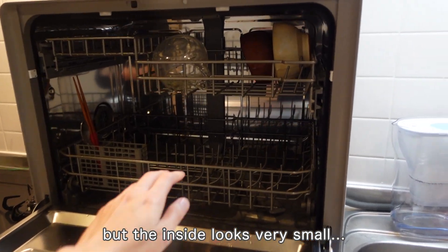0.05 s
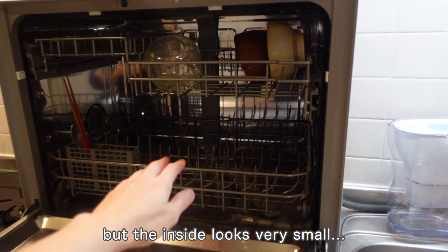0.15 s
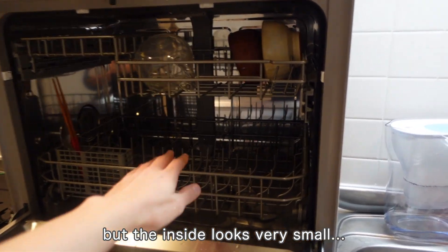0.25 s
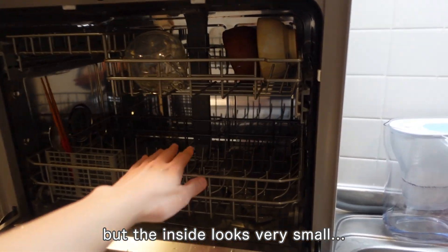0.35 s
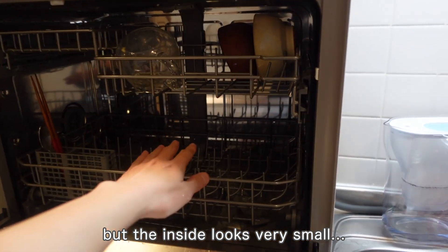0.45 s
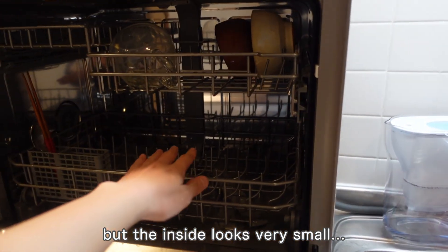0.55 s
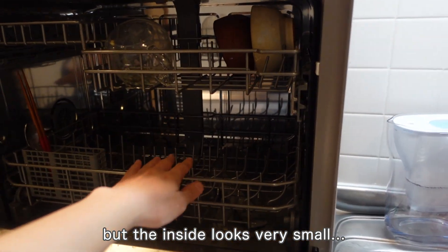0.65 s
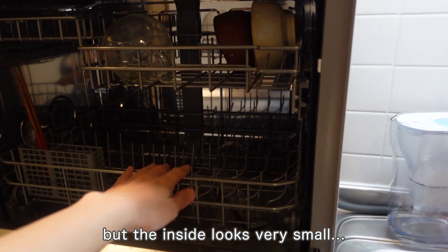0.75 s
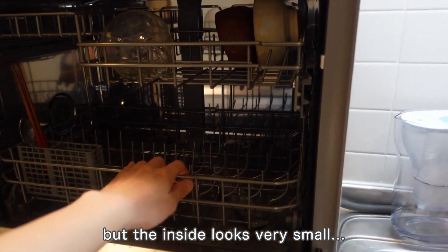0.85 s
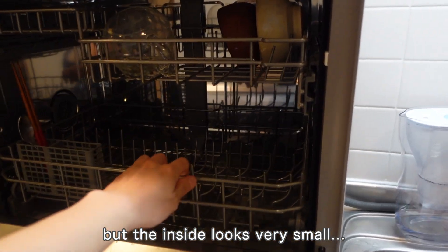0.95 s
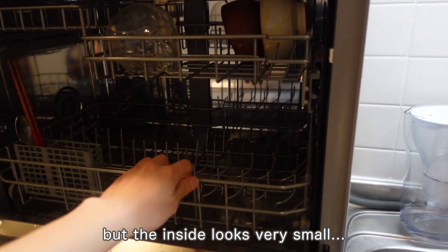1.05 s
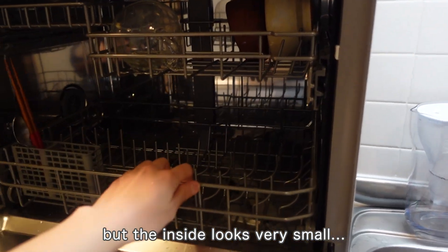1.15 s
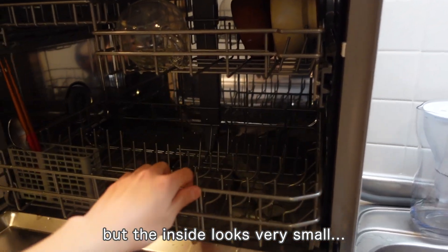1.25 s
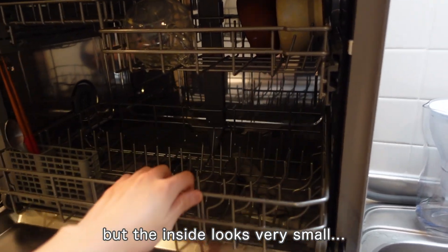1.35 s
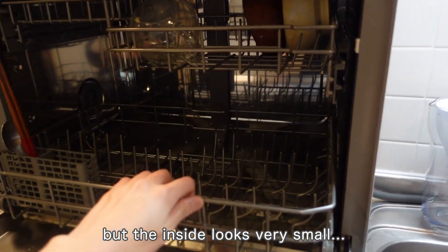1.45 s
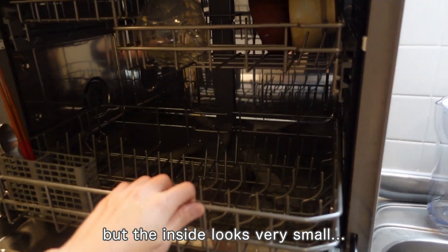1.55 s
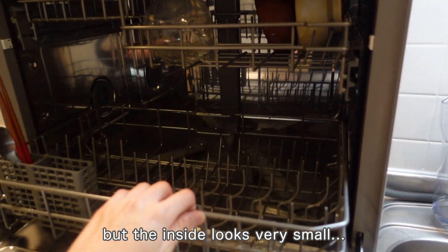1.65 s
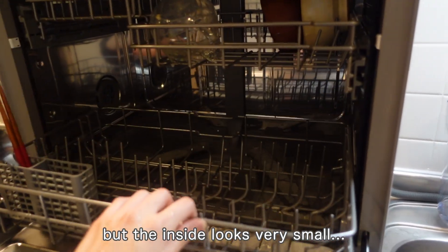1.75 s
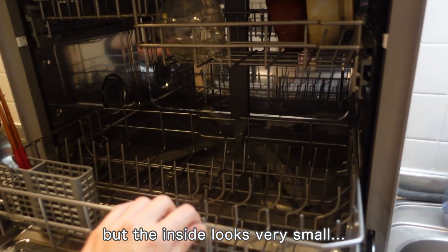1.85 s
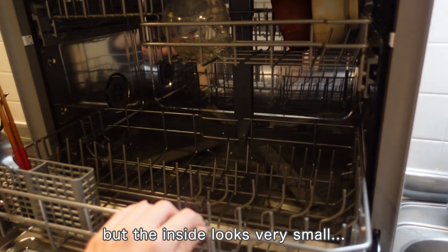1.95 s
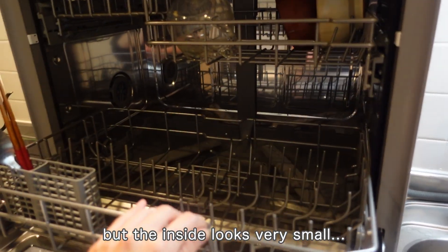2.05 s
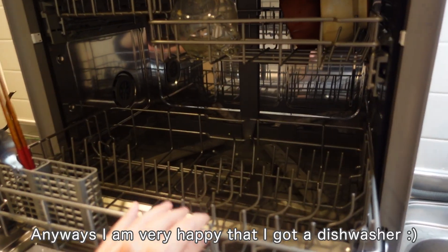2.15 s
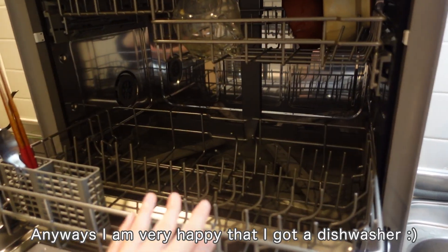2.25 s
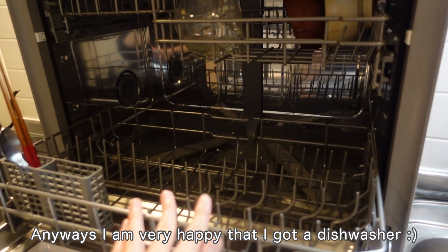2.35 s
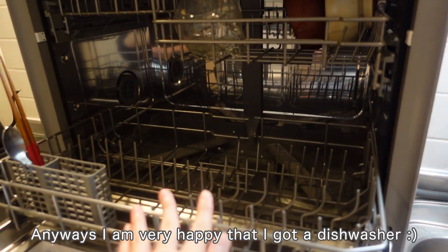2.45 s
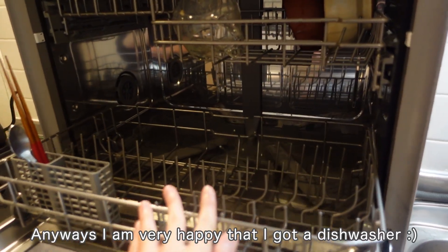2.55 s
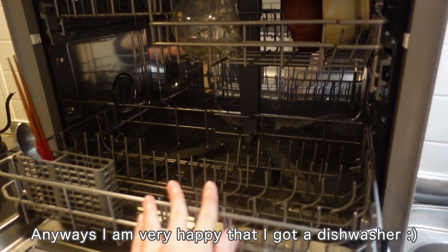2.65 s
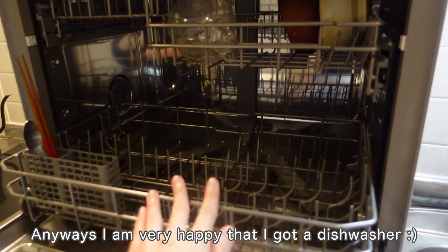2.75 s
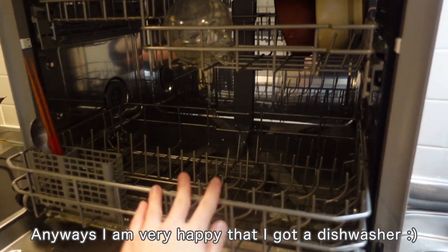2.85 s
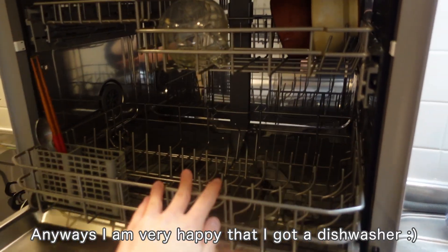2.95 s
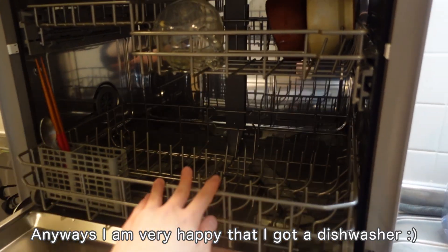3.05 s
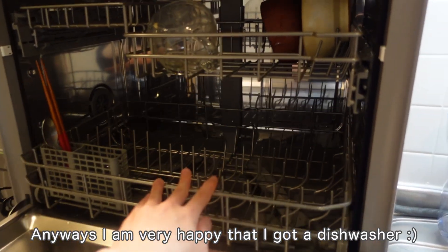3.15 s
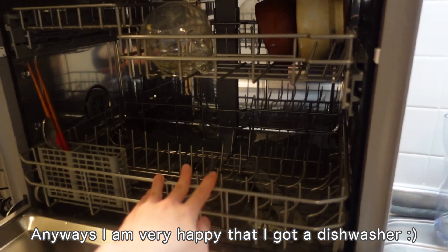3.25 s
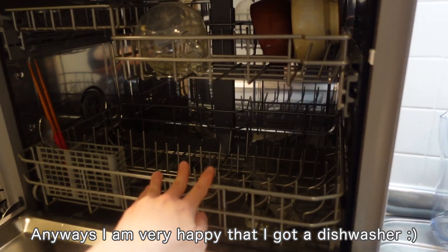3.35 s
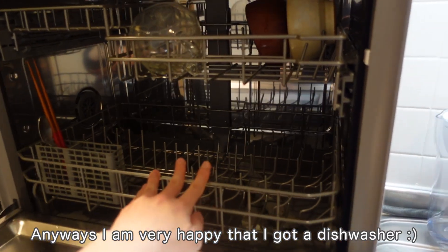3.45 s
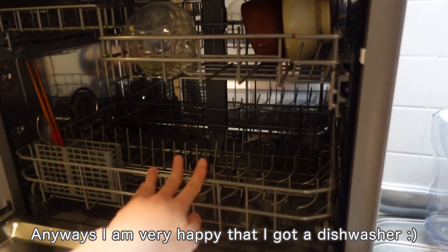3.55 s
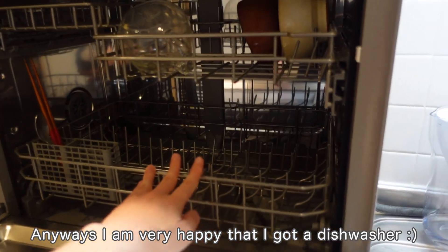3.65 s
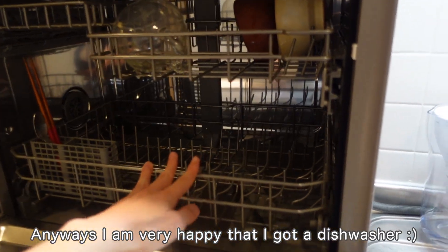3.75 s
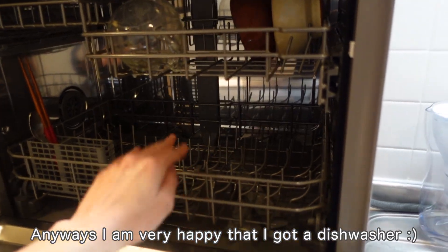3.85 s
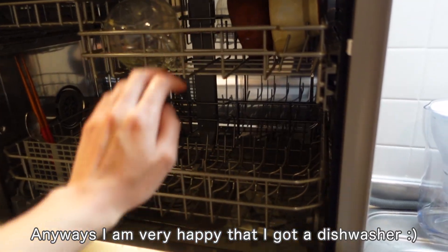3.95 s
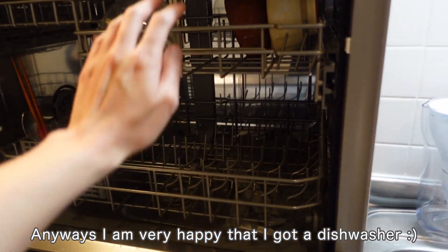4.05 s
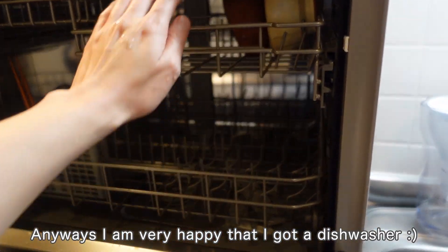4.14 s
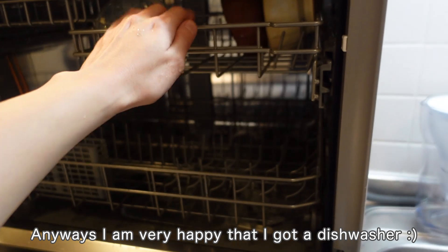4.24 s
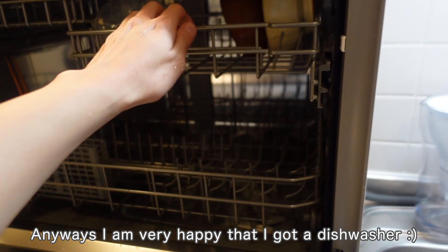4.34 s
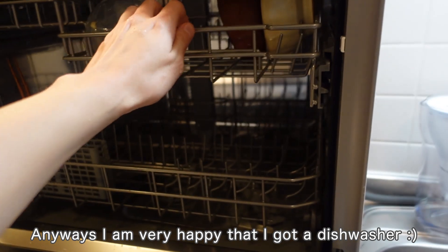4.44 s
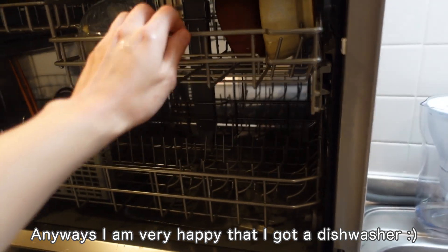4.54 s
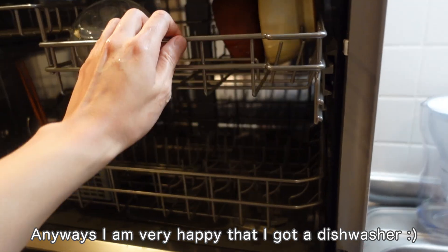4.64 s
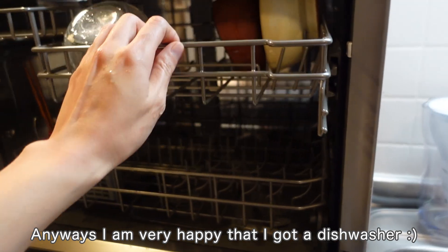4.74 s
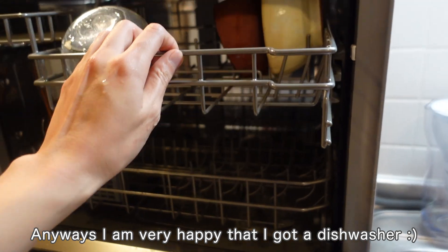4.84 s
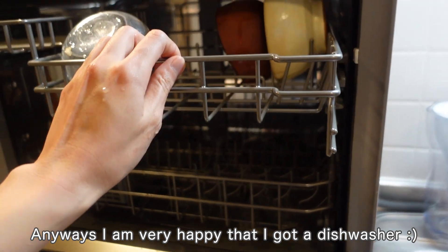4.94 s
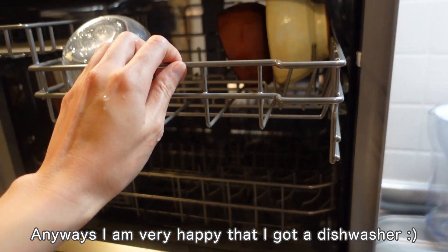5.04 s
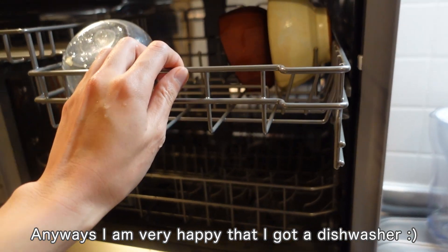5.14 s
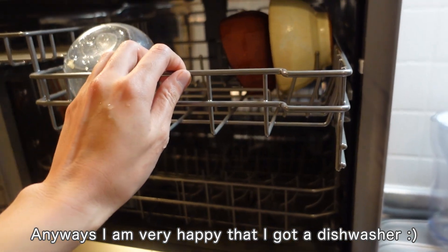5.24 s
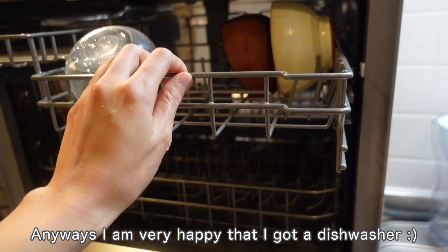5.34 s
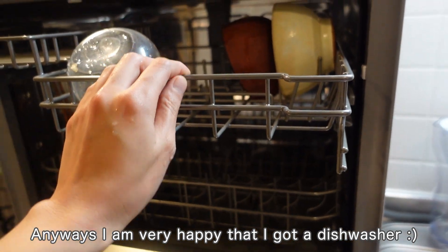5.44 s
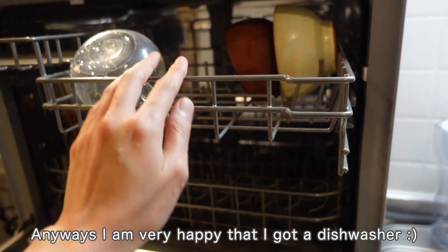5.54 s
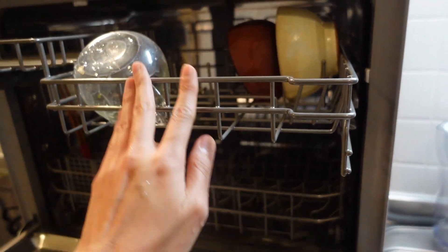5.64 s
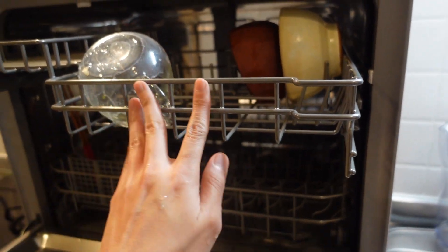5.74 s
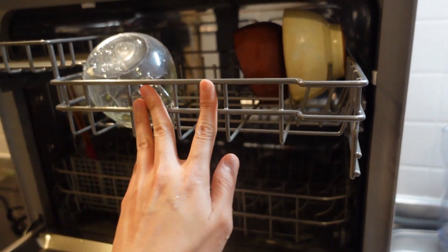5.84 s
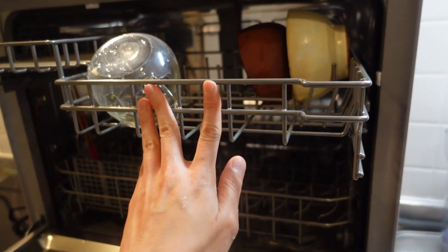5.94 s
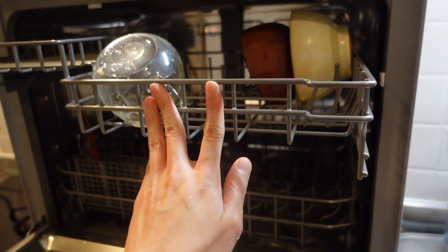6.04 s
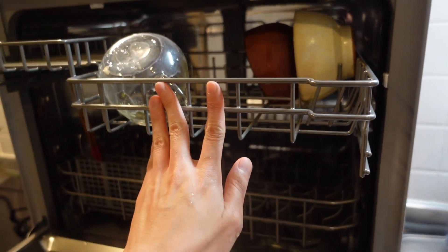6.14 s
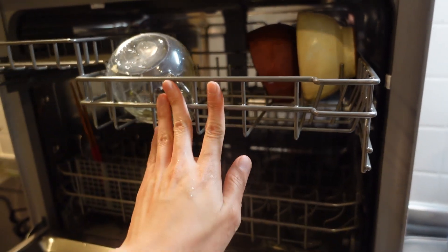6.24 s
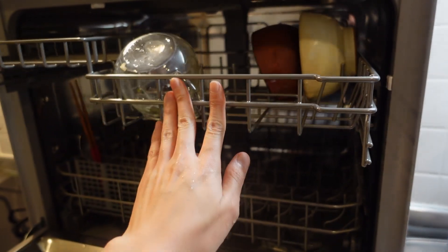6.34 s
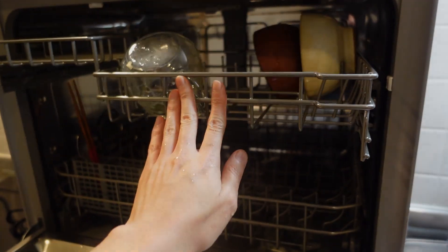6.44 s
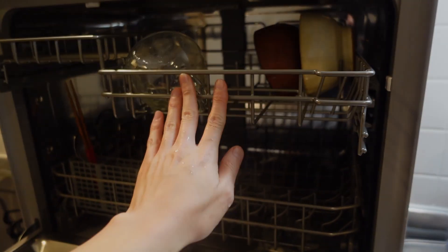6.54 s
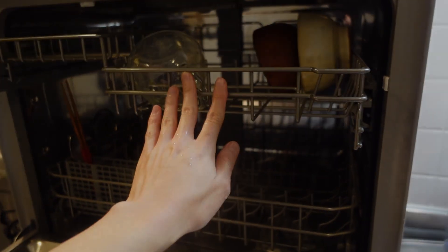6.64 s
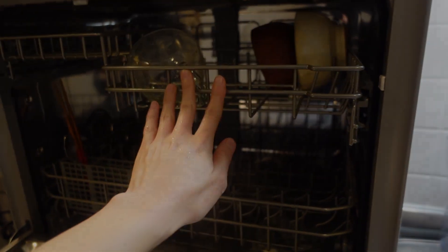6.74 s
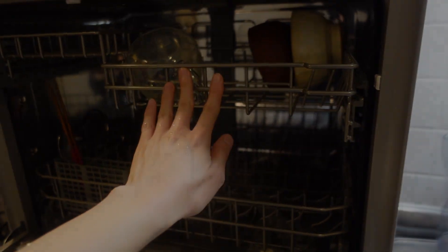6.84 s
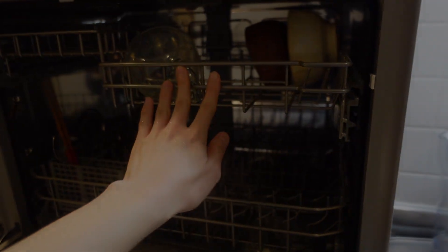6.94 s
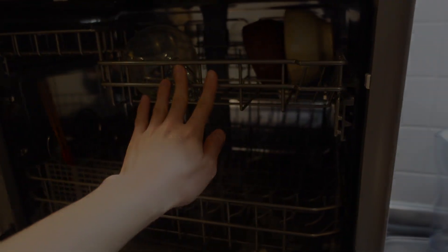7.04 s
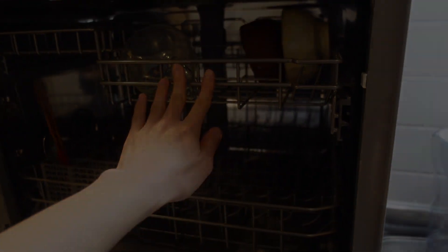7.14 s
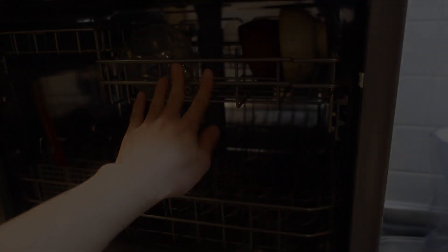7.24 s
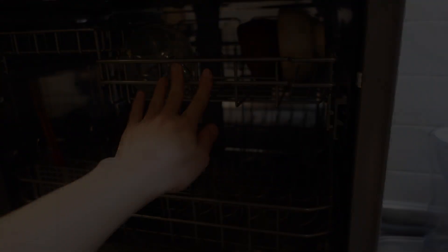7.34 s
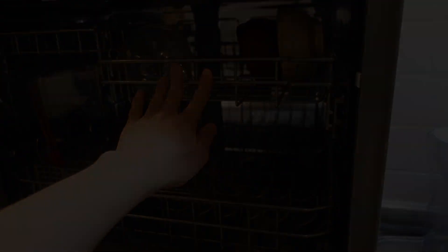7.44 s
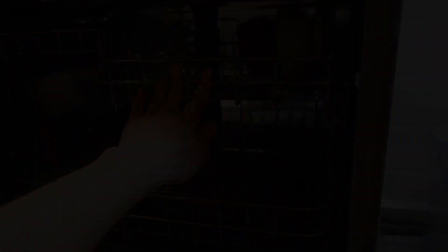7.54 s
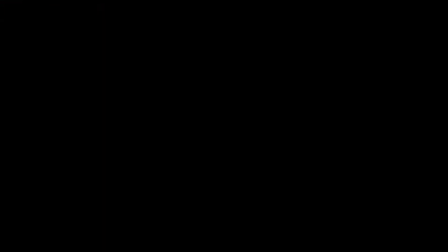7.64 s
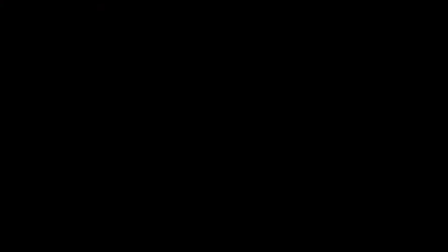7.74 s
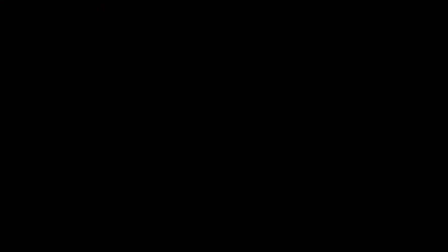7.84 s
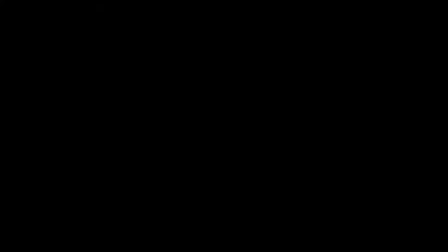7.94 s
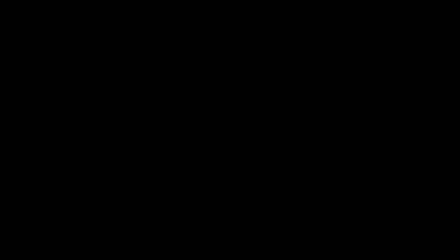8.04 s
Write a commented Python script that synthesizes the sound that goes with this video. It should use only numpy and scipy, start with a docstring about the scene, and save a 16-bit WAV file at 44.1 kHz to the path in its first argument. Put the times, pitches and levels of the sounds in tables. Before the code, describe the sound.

After a faint fading hiss and near silence, a lower wire rack knocks and rumbles on its wheels, out and back, climbing into the tub with bright cutlery jingle. The upper rack follows: hissing runners, a glass clink, one loud metallic slam, a quiet gap, then a slow push home with scattered clacks and ceramic rattling. Close stereo pickup, metal tub resonance, small tiled kitchen, no talking.

```python
"""A soft hiss fades as a hand reaches in; then the hand rolls the lower wire rack of a small dishwasher out and back.
Its plastic wheels rumble, its wires knock, and cutlery jingles as it climbs back into the tub.
The upper rack slides out on hissing runners, slams on its front stop and is pushed home; a glass bowl, then cups
chatter on its wires. Knocks are noisy cracks with damped partials, dishes ring in modes, sliding is filtered noise.
The steel tub and a tiled kitchen ring after every blow, over a quiet room tone."""
import sys
import numpy as np
from scipy import signal
from scipy.fft import rfft, irfft
from scipy.io import wavfile

SR = 44100
rng = np.random.default_rng(int(sys.argv[2]) if len(sys.argv) > 2 else 0)


def master_out(mix):
    """Clip the mix to full scale and print it as 16-bit PCM to the path in sys.argv[1]."""
    frames = np.transpose(np.atleast_2d(mix))
    ceiling = np.clip(frames, -1, 1)
    pcm = np.round(ceiling * 32767).astype(np.int16)
    wavfile.write(sys.argv[1], SR, pcm)


N = 356769
TIME = np.arange(N) / SR
RING = TIME[:SR]  # one second, for decays
TOP_HZ = 15900  # upper edge of the sound


def amp(db):
    """Decibels to gain."""
    return 10 ** (np.asarray(db) / 20)


def unit(x):
    """Scale to rms 1."""
    return x / np.sqrt(np.mean(x ** 2))


def fade(t60):
    """One second of exponential decay, falling 60 dB in t60 seconds."""
    return np.exp(-np.log(1000) * RING / max(t60, 1 / SR))


def add(track, s, sound):
    """Mix a sound into a track from time s on."""
    start = int(s * SR)
    track[start:start + len(sound)] += sound[:N - start]


def band(x, lo_hz, hi_hz):
    """Causal band-pass."""
    edges = [lo_hz, min(hi_hz, SR / 2 - 1)]
    return signal.sosfilt(signal.butter(3, edges, "band", fs=SR, output="sos"), x)


def colour(x, points):
    """Causal minimum-phase filter through (Hz, dB) points, from the folded cepstrum."""
    hz, db = np.transpose(points)
    size = 2 ** 11
    log_hz = np.log(np.fft.rfftfreq(size, 1 / SR) + 1)
    gain = amp(np.interp(log_hz, np.log(hz), db))
    cepstrum = irfft(np.log(gain))[:size // 2]
    cepstrum[1:] *= 2
    impulse = irfft(np.exp(rfft(cepstrum, size)))
    return signal.oaconvolve(x, impulse)[:len(x)]


# Colour of the opening hiss. Each row: frequency in Hz, gain in dB.
HISS_COLOUR = [(180, -64), (300, -30), (616, -23), (750, -11), (991, -17), (1290, -4), (2140, 5),
               (6300, -1.5), (15000, -26)]


def reaching_hiss():
    """Soft filtered noise that fades steadily as the hand reaches in."""
    start_db, fade_db_per_s = -43.5, 74.5
    noise = unit(colour(rng.standard_normal(N), HISS_COLOUR))
    return amp(start_db - fade_db_per_s * TIME) * noise


# Colour of the quiet room. Each row: frequency in Hz, gain in dB.
ROOM_COLOUR = [(18, -50.5), (30, -11.5), (92, -32), (120, -9), (202, -8.5), (277, -3), (492, -2.5),
               (639, -1), (874, -4), (1550, 0), (3980, -7.5), (7650, -12), (15500, -16)]


def room_tone(level_db):
    """Steady filtered noise of the quiet room."""
    return amp(level_db) * unit(colour(rng.standard_normal(N), ROOM_COLOUR))


# Reverberation of tub and kitchen. Each row: frequency in Hz, 60 dB decay time in seconds, level in dB.
TUB = [(60, 0.3, -3.5), (200, 0.65, -6.5), (458, 0.25, -6), (970, 0.89, -5), (2200, 0.54, -11.5),
       (4500, 0.83, -9.5), (9000, 0.17, -8.5), (16000, 0.63, -9)]


def tub_tail():
    """Diffuse reverberation: noise that swells and decays, octave by octave, each with its own decay time."""
    hz, t60, db = np.transpose(TUB)
    tail = 0
    for centre in 45 * 2. ** np.arange(9):
        octave_t60 = np.interp(np.log(centre), np.log(hz), t60)
        octave_db = np.interp(np.log(centre), np.log(hz), db)
        decay = fade(octave_t60) * (1 - fade(0.046))
        echoes = rng.standard_normal(SR) * decay / np.linalg.norm(decay)
        tail = tail + amp(octave_db) * band(echoes, centre / np.sqrt(2), centre * np.sqrt(2))
    return tail


def strike(hits, modes):
    """Each hit rings the object's modes; where it lands changes their mix, and the contact detunes them a little."""
    hz, db, t60 = np.transpose(modes)
    length = SR // 2
    swell = 1 - fade(0.0067)
    decays = np.array([fade(t) * swell for t in t60])[:, :length]
    out = np.zeros(N)
    for s, hit_db, *_ in hits:
        place, contact, sign = rng.standard_normal((3, len(hz)))
        mix = amp(db + 2 * place) * np.sign(sign)
        detuned_hz = hz * (1 + .003 * contact)
        waves = np.cos(2 * np.pi * np.outer(detuned_hz, RING[:length])) * decays
        add(out, s, amp(hit_db) * mix / np.linalg.norm(mix) @ waves)
    return band(out, 110, TOP_HZ)


# Faint, dull blips in the pauses. Each row: start in seconds, level in dB.
BLIPS = [(.43, -55.5), (4.112, -57.5), (4.16, -60)]
# Ringing of a blip. Each row: frequency in Hz, relative level in dB, 60 dB decay time in seconds.
BLIP_MODES = [(560, -11, .08), (610, -6, 0.134)]


def blips():
    """Faint, dull blips made of a few short modes."""
    return strike(BLIPS, BLIP_MODES)


def sliding(strokes, power):
    """Gain of a sliding noise: in each stroke the rack speeds up evenly, runs on and slows to rest."""
    gain = np.zeros(N)
    for start, rise, steady, fall, db in strokes:
        corners = start + np.cumsum([0, rise, steady, fall])
        speed = np.interp(TIME, corners, [0, 1, 1, 0])
        gain += amp(db) * speed ** power
    return gain


def friction(points, rate, waver_db, waver_rate):
    """Tiny slips of uneven size, rate per second on average; the hand's pressure wavers."""
    slips = (rng.random(N) < rate / SR) * rng.standard_normal(N)
    pressure = np.interp(TIME * waver_rate, np.arange(SR), rng.standard_normal(SR))
    return unit(colour(slips, points) * amp(waver_db * pressure))


# What each bounce loses. One row: clack loss in dB, thud loss in dB, tick loss in dB.
CHATTER_LOSS_DB = (3, -0.1, 6.0)


def contacts(knocks, skew_s, count=3):
    """One side lands, then the other, skew_s later; a heavy landing bounces on, losing clack and most of all tick."""
    chatter_above_db, gap_s = -27.5, .008  # clack that starts the bouncing, mean time between bounces
    hits = []
    for (s, *near_db, far_db), chance in zip(knocks, rng.uniform(-1, 1, (len(knocks), count))):
        landing_db = np.add(near_db, far_db)
        hits += [(s, *near_db), (s + skew_s, *landing_db)]
        if landing_db[0] > chatter_above_db:
            bounces = s + skew_s + np.cumsum(gap_s * (1 + .2 * chance))
            for k, at in enumerate(bounces):
                hits.append((at, *(landing_db - np.multiply(CHATTER_LOSS_DB, k + 1))))
    return hits


def wire_modes(length, spacing_hz):
    """Steady partials at random frequencies, spacing_hz apart on average."""
    present = rng.random(length // 2 + 1) < SR / length / spacing_hz
    phases = np.exp(2j * np.pi * rng.random(len(present)))
    return unit(irfft(present * phases, length))


def clatter(knocks, points, t60s, trims_db, crack_db, crack_t60, rise, spacing_hz, lowest_hz, low_hz, high_hz):
    """A knock is a short noisy crack, then the quickly damped partials of the welded wires it reaches."""
    out = np.zeros(N)
    bands = [(low_hz, high_hz), (lowest_hz, low_hz), (high_hz, TOP_HZ)]  # clack, thud, tick
    length, level_window = SR // 4, SR // 100  # a knock's energy is levelled as if it filled the window
    swell = 1 - fade(rise)[:length]  # the blow takes a moment to spread through the rack
    for s, *levels_db in knocks:
        partials = wire_modes(length, spacing_hz)
        crack = amp(crack_db) * rng.standard_normal(length) * fade(crack_t60)[:length]
        for edges, t60, db, trim_db in zip(bands, t60s, levels_db, trims_db):
            blow = swell * (crack + partials * fade(t60)[:length])
            wires = band(colour(blow, points), *edges)
            add(out, s, amp(db + trim_db) * wires / np.sqrt(np.sum(wires ** 2) / level_window))
    return out


def hard_blows(knocks, full_db, steepness):
    """Light knocks stay near the contact; only hard ones set the whole frame ringing."""
    return [(s, db + steepness * min(db - full_db, 0)) for s, db, *_ in knocks]


# The lower rack is gripped, drops onto the door, rolls out and back, climbs into the tub and meets the back stop.
# Each row: start in seconds, clack, thud and tick levels in dB before trims, far side's landing in dB
# relative to the first.
LOWER_KNOCKS = [ (1.012, -44.5, -69, -54, 3.5), (1.192, -40.5, -63, -53, 1),
                (1.2305, -32.5, -58, -34.5, -8), (1.322, -20.5, -36.5, -31, 6.5),
                (1.42, -26, -27, -46, -5.5), (1.52, -37, -37, -61, -5), (1.758, -40, -51, -65, -17),
                (1.841, -31.5, -61, -49.5, -5.5), (2.176, -42.5, -72, -59, -5.5),
                (2.418, -35, -61, -47.5, -9), (2.627, -36, -53, -50, -7), (2.778, -34.5, -50, -52.5, 5.5),
                (3.168, -42, -64, -51, -9), (3.2255, -29.5, -53.5, -35.5, 2), (3.256, -22.5, -42, -26, 0),
                (3.2885, -21, -44, -18.5, -14), (3.312, -24, -42, -19.5, -2), (3.348, -21.5, -40, -28, -8),
                (3.403, -31, -39, -33.5, 1.5), (3.764, -25, -31.5, -32.5, -5)]
# Ringing of the lower frame. Each row: frequency in Hz, relative level in dB, 60 dB decay time in seconds.
LOWER_MODES = [(230, -11, .2), (395, -5, .2), (500, -5, .2), (655, 0, .22), (740, -3, .2), (955, -5, .18),
               (1171, -3, .2), (1580, -3, .2), (1730, 0, .22), (2000, -4, .2), (2153, -5, .22),
               (2550, -3, .22), (2790, -3, .2)]
# Colour of the lower knocks. Each row: frequency in Hz, gain in dB.
LOWER_COLOUR = [(40, -37.5), (130, -24), (225, -15.5), (290, -16.5), (650, -7.5), (900, 4), (1700, 11.5),
                (2800, 4.5), (3600, -2), (6000, -7.5), (8400, -10.5), (11000, -21), (15500, -34)]
# Colour of the rolling wheels. Each row: frequency in Hz, gain in dB.
ROLL_COLOUR = [(50, -36), (145, -28), (225, 0.5), (300, -9), (410, -5), (520, -0.5), (660, 5), (860, -2),
               (1700, 1.5), (2300, 0.5), (3400, -14), (5500, -18), (8600, -16.5), (15500, -38)]
# Strokes of the hand on the lower rack. Each row: start in seconds, speeding up, steady and slowing times
# in seconds, rumble in dB at full speed before the wheels are mixed.
LOWER_STROKES = [(0.979, 0.05, .01, .12, -52), (.95, 0.44, .06, 0.96, -46.5), (2.31, .4, 0.68, 0.49, -50.5),
                 (3.76, .05, .03, 0.18, -55)]


def lower_rack():
    """Plastic wheels rumble over steel, louder with speed; the askew rack knocks and its frame rings."""
    hits = contacts(LOWER_KNOCKS, skew_s=.02)
    knocks = clatter(hits, LOWER_COLOUR, t60s=(.1, .13, .085), trims_db=(-6, -3, -3), crack_db=-2.5,
                     crack_t60=0.033, rise=0.0016, spacing_hz=50.47, lowest_hz=35, low_hz=587, high_hz=3540)
    ring = amp(-15.5) * strike(hard_blows(hits, full_db=-19.0, steepness=0.44), LOWER_MODES)
    # the wheels on either side each meet their own grit
    wheels = sum(friction(ROLL_COLOUR, rate=1200, waver_db=2.5, waver_rate=50) for _ in range(2))
    coarse_grains = amp(-8) * friction(ROLL_COLOUR, rate=64, waver_db=1.5, waver_rate=11)
    rumble = amp(-4.5) * sliding(LOWER_STROKES, power=1.76) * (wheels + coarse_grains)
    return knocks + ring + rumble


# Cutlery jumping in its basket. Each row: start in seconds, level in dB.
CUTLERY_HITS = [(3.283, -17), (3.290, -25.5), (3.312, -29), (3.333, -35), (3.403, -46)]
# Ringing of the cutlery. Each row: frequency in Hz, relative level in dB, 60 dB decay time in seconds.
CUTLERY_MODES = [(2078, -8, .2), (2771, 0, .18), (2850, -4, .16), (4400, -9, .3), (4748, -9, .25),
                 (5324, -9, .2), (6115, -5, .22), (6280, -4, .26), (6400, -5, .14), (8339, -14, .3),
                 (8550, -12, .22), (9128, -5, .22), (10680, -14, .13), (11130, -12, .15)]


def cutlery():
    """Cutlery in the lower rack jingles in bright modes."""
    return strike(CUTLERY_HITS, CUTLERY_MODES)


# The upper wheels ride over joints in the runners. Each row: start in seconds, push in dB before the final lift.
WHEEL_BUMPS = [(4.322, -55.5), (4.655, -36), (4.72, -44), (7.017, -40), (7.17, -52), (7.271, -50.5),
               (7.377, -48)]
# Colour of the upper frame under its wheels. Each row: frequency in Hz, gain in dB.
FRAME_COLOUR = [(50, -47.5), (125, -21.5), (172, 0.5), (230, -9.5), (290, 1), (350, -10.5), (415, 3.5),
                (550, -11.5), (900, -21), (3000, -51), (15000, -77.5)]


def wheel_bumps(knocks):
    """Joints under the wheels and knocks each give the upper frame a soft push that makes it rumble briefly."""
    knock_push_db = -10.5  # relative to the listed thud
    knock_pushes = [(s, thud_db + knock_push_db) for s, _, thud_db, *_ in knocks]
    push = np.zeros(N)
    for s, db in WHEEL_BUMPS + knock_pushes:
        add(push, s, amp(db) * fade(0.19) * (1 - fade(0.11)))
    return amp(3.5) * push * unit(colour(rng.standard_normal(N), FRAME_COLOUR))


# The upper rack is pulled free, slams on the front stop, is pushed back and settles home.
# Each row: start in seconds, clack, thud and tick levels in dB before trims, far side's landing in dB
# relative to the first.
UPPER_KNOCKS = [ (4.3953, -39, -42.5, -64, -9), (4.4903, -24, -31, -35, -23),
                (4.5015, -21, -33.5, -30.5, -2), (4.672, -31.5, -36, -52, -7.5), (4.813, -7, -21, -11, -9),
                (4.8365, -12.5, -21.5, -11.5, -3.5), (5.176, -37.5, -42.5, -52.5, 1),
                (6.0045, -40.5, -45, -68.5, -7.5), (6.408, -34.5, -42, -60, -18),
                (6.4363, -35.5, -38, -40.5, -5), (6.5845, -20.5, -35.5, -29, -12),
                (6.771, -20, -28.5, -34, -9.5), (7.398, -24.5, -35, -32.5, -16),
                (7.4684, -34, -38, -45, -2.5), (7.5855, -27, -35.5, -33.5, -4),
                (7.896, -30.5, -39.5, -47, 2), (8.0, -27, -35.5, -46.5, 2)]
# Ringing of the upper frame. Each row: frequency in Hz, relative level in dB, 60 dB decay time in seconds.
UPPER_MODES = [(181, -15.5, .25), (410, -4.5, 0.15), (736, 0.5, 0.17), (1038, -4.5, 0.23),
               (1099, 0.5, 0.26), (1540, 3, 0.086), (1760, -6.5, 0.25), (2462, -5.5, 0.18), (2970, -2, .18),
               (3390, -3, 0.21), (4140, -13.5, 0.36), (4210, -7, 0.2), (5092, -14.5, 0.37),
               (5630, -11, 0.22), (6390, -23.5, 0.16), (7000, -19, 0.18)]
# Colour of the upper knocks. Each row: frequency in Hz, gain in dB.
UPPER_COLOUR = [(40, -51.5), (90, -26.5), (130, -15), (172, -10.5), (240, -9), (420, -2), (540, -5),
                (760, 0.5), (1080, 4.5), (1700, 9.5), (3100, 5), (4200, -4), (6200, -9), (8000, -19.5),
                (10500, -22), (15500, -36.5)]
# Colour of the gliding runners. Each row: frequency in Hz, gain in dB.
GLIDE_COLOUR = [(100, -33.5), (300, -23.5), (600, -4.5), (1100, -4), (1700, 2), (2600, 5.5), (4000, -0.5),
                (6000, -2), (9000, -6), (12000, -11.5), (15500, -21.5)]
# Strokes on the upper rack. Each row: start in seconds, speeding up, steady and slowing times in seconds,
# hiss in dB at full speed.
UPPER_STROKES = [(4.37, 0.1, 0.32, 0.62, -44.5), (5.96, 0.033, .02, 0.17, -62.5),
                 (5.98, .44, 0.2, 1.35, -49), (7.4, 0.17, .02, 0.11, -54)]


def upper_rack():
    """The runners hiss, louder with speed, the wheels bump, and the frame rings when it meets a stop."""
    hits = contacts(UPPER_KNOCKS, skew_s=.017)
    knocks = clatter(hits, UPPER_COLOUR, t60s=(.11, .12, .08), trims_db=(-6, -4, -4), crack_db=-2,
                     crack_t60=0.06, rise=.005, spacing_hz=75, lowest_hz=134.0, low_hz=926, high_hz=3970)
    ring = amp(-12.0) * strike(hard_blows(hits, full_db=-11.0, steepness=1.0), UPPER_MODES)
    slips = friction(GLIDE_COLOUR, rate=18000, waver_db=1.0, waver_rate=35)
    runners = sliding(UPPER_STROKES, power=1.5) * slips
    return knocks + ring + wheel_bumps(UPPER_KNOCKS) + runners


# The glass bowl tapping the wires. Each row: start in seconds, level in dB.
BOWL_HITS = [(4.488, -24), (4.501, -18.5), (4.512, -32), (4.815, -17), (6.586, -36), (7.479, -36)]
# Ringing of the bowl. Each row: frequency in Hz, relative level in dB, 60 dB decay time in seconds.
BOWL_MODES = [(436, -11.5, 0.14), (797, -14.5, .1), (1064, -2.5, 0.24), (1880, -8, .13), (2105, -11, .13),
              (2686, 6, .09), (3022, 2.5, 0.088), (3550, -9, 0.093), (4020, 2, 0.31), (4140, -16.5, 0.35),
              (4220, -4, 0.13), (5040, -24, .15), (6070, -20, .1), (7590, -20, 0.15)]


def glass_bowl():
    """A glass bowl on the upper rack rings as it taps the wires."""
    return strike(BOWL_HITS, BOWL_MODES)


# The cups rocking. Each row: start in seconds, level in dB.
CUP_HITS = [(7.872, -38.5), (7.897, -31), (7.913, -26), (7.948, -28), (7.997, -17.5), (8.015, -20.5)]
# Ringing of the cups. Each row: frequency in Hz, relative level in dB, 60 dB decay time in seconds.
CUP_MODES = [(830, -19, 0.17), (900, 4, 0.21), (1190, -1.5, 0.11), (1593, -4, 0.54), (1900, -3, 0.1),
             (2170, -9.5, 0.16), (2480, 0.5, 0.11), (2594, -5, 0.38), (3262, 8, 0.085), (3222, 7.5, 0.047),
             (3440, -20, .08), (4060, 2, 0.12), (3900, -8, 0.1), (4950, -6, 0.14), (6700, -17.5, 0.097),
             (7710, -12.5, 0.11), (7570, -28, 0.15), (10260, -23, 0.089)]


def cups():
    """Cups rock and chatter on the upper rack."""
    return strike(CUP_HITS, CUP_MODES)


def scene():
    """All sources in the tub, heard by two closely spaced microphones."""
    dry = reaching_hiss() + blips() + lower_rack() + cutlery() + upper_rack() + glass_bowl() + cups()
    mid = dry + signal.fftconvolve(dry, tub_tail())[:N]
    # sideways reflections differ between the microphones, though hardly in the bass
    side_colour = [(120, -30.0), (450, -11.5), (4000, -5.5), (12000, -8.0)]
    side = colour(signal.fftconvolve(dry, tub_tail())[:N], side_colour)
    mid = mid + room_tone(level_db=-66)
    side = side + room_tone(level_db=-70)
    left = amp(-.5) * (mid + side)
    right = mid - side
    return np.array([left, right])


def record(dry):
    """A steep low-pass cuts the top."""
    return signal.sosfilt(signal.ellip(10, .2, 70, TOP_HZ, fs=SR, output="sos"), dry)


dry = scene()
out = record(dry)
master_out(out)
```